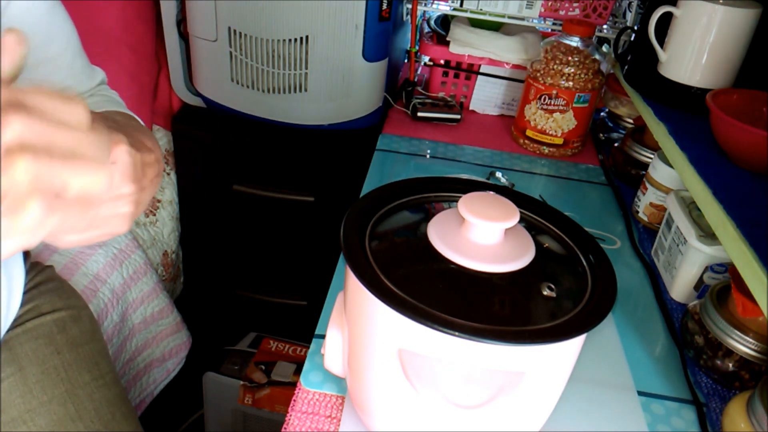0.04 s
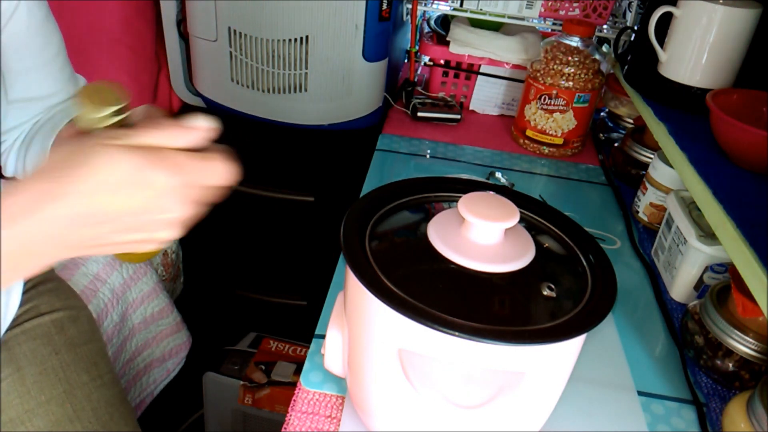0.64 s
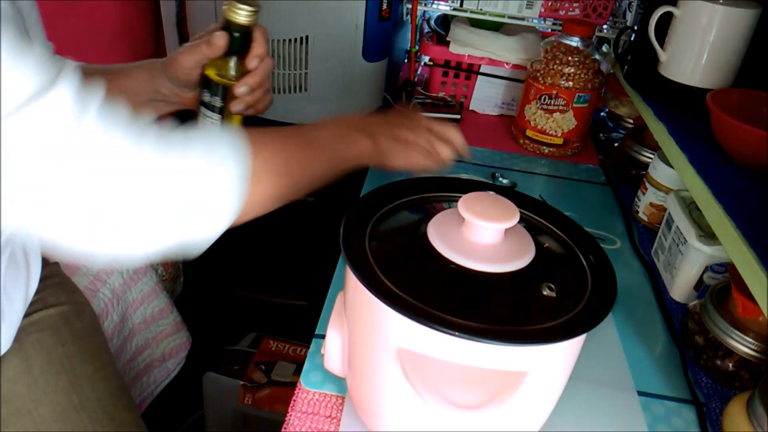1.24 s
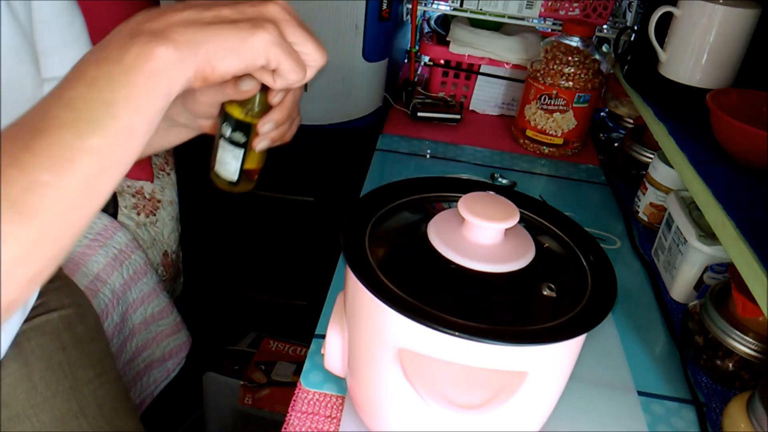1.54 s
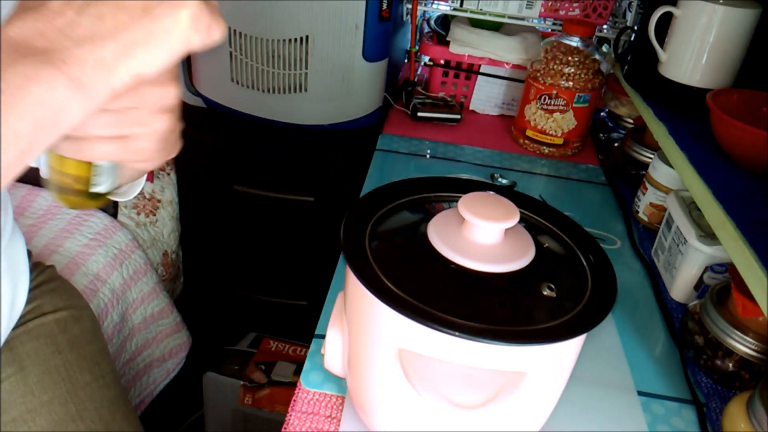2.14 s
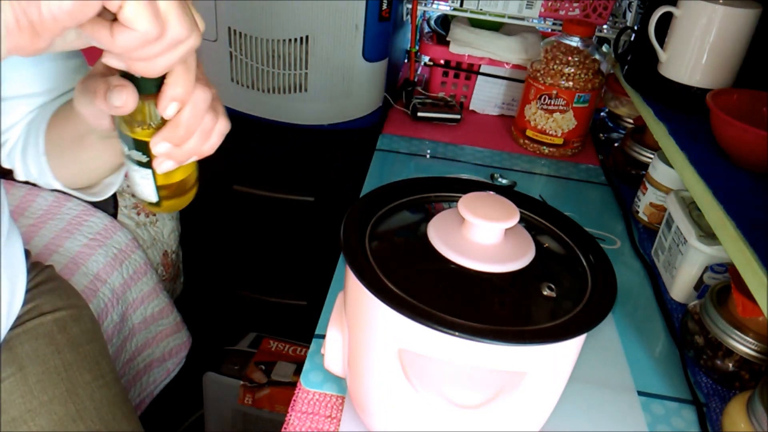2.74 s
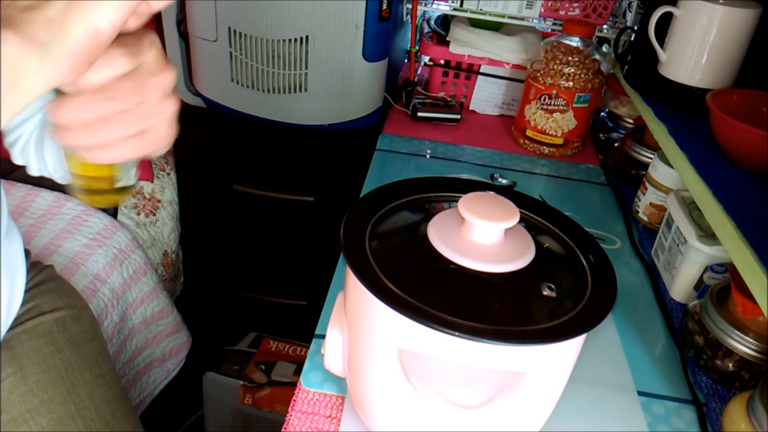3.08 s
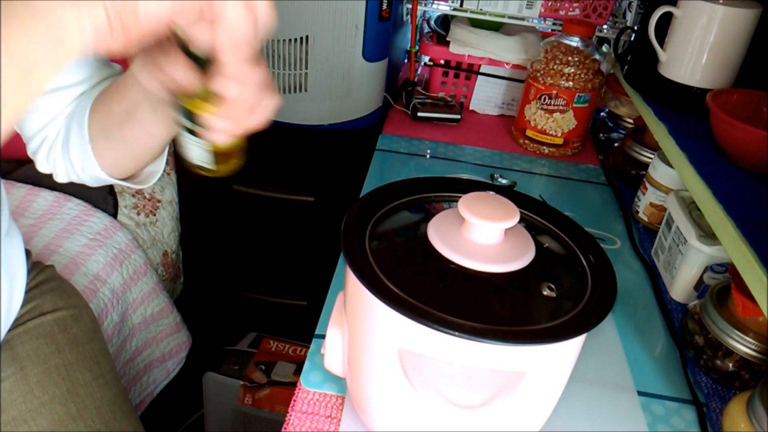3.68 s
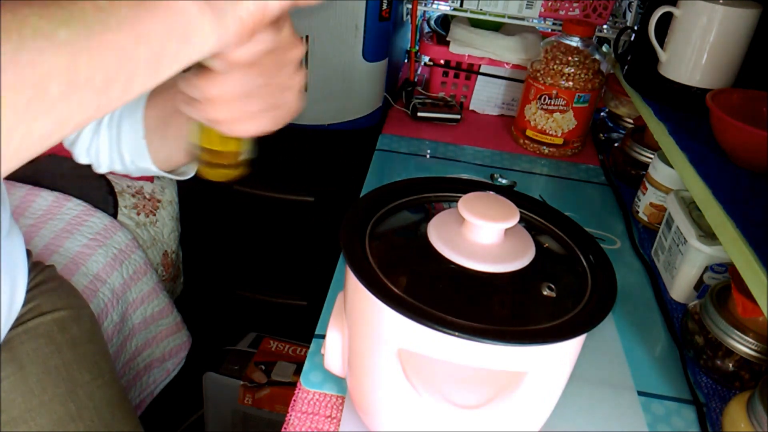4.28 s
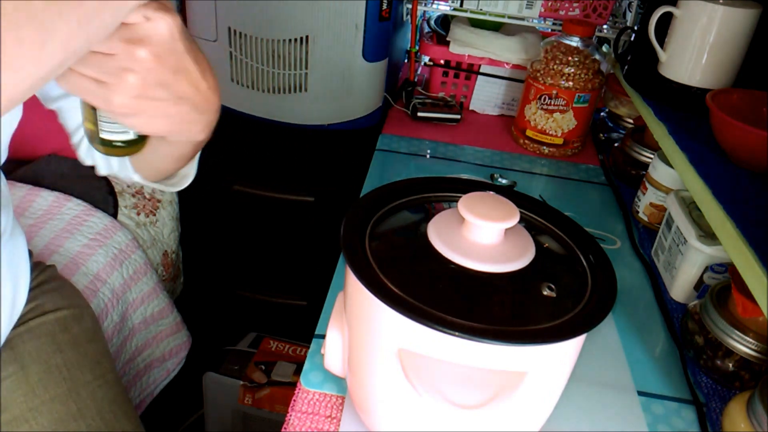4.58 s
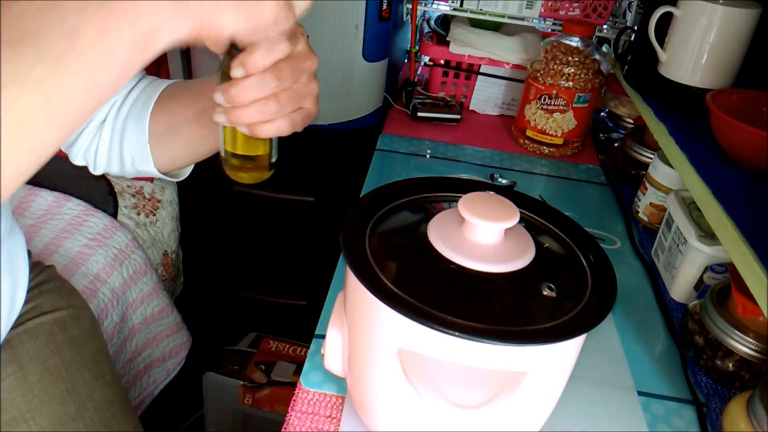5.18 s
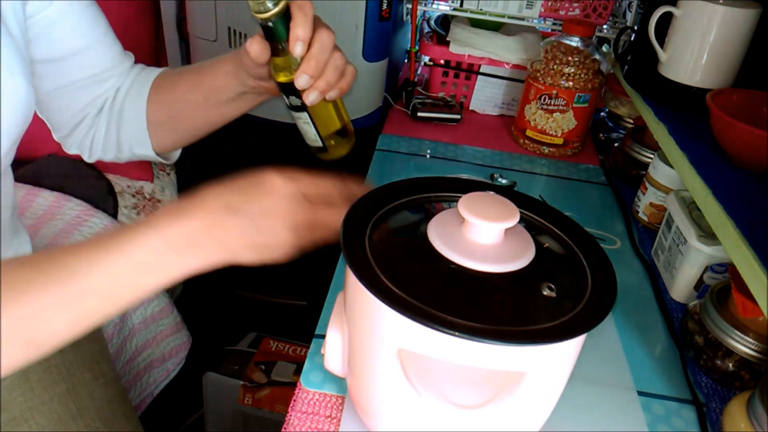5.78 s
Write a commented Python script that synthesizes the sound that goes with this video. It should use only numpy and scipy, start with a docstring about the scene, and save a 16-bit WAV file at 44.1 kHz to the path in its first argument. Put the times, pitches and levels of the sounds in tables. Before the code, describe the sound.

A faint, steady low hum and hiss fill a small kitchen, heard in stereo from close by. Between about 0.2 and 0.7 seconds, fingers make a few light, high ticks and a small scrape on the screw cap of a small glass bottle. Around 0.7 to 0.9 seconds the bottle knocks softly and dully in the hand, and sleeves brush faintly afterwards. At about 2.1 to 2.2 seconds the cap is twisted and its seal tears in two quick clusters of loud, sharp snaps. Another snap comes at 2.5 seconds, a softer one at 3.1, and a loud pair at 4.3 and 4.4. Each snap is bright, rings very briefly and has a short echo. Soft, low hand bumps follow from 4.5 to 4.8 seconds, then a barely audible sleeve brush near 5.3, leaving the hum until about 6 seconds.

```python
"""Fingers tick and scrape on the screw cap of a small glass bottle, which knocks dully in the hand.
Then each twist snaps bridges of the seal, some in quick pairs: a bridge tears and the cap rings briefly.
Fingertips whisper over the glass, hands bump softly and sleeves brush. The small kitchen answers with
a short echo, and a low hum and hiss lie under it all. Two microphones hear it from close by."""
import sys
import numpy as np
from scipy import signal
from scipy.fft import rfft, irfft, next_fast_len
from scipy.io import wavfile
from scipy.ndimage import uniform_filter1d, map_coordinates

SR = 44100
rng = np.random.default_rng(int(sys.argv[2]) if len(sys.argv) > 2 else 0)


def wav_out(sig):
    """Save sig, one row per channel (or a flat mono array), as 16-bit PCM at SR to the path in sys.argv[1]."""
    wavfile.write(sys.argv[1], SR, np.round(np.clip(np.atleast_2d(sig).T, -1, 1) * 32767).astype(np.int16))


N = 256648


# Ticks and snaps of the cap. Each row: start in seconds, level in dB, low cut in Hz, lower favoured mode
# in Hz, its lift in dB, upper favoured mode in Hz, its lift in dB, amount of body, amount of treble,
# pan to the left in dB, room send in dB.
CAP_SNAPS = [(0.251, -30, 7040, 6500, 5.5, 9700, 10, -5.5, 4.5, 0, 4),
             (0.4644, -40, 6840, 6500, -6, 8300, 5, -11, 7, -3, 6.5),
             (0.7156, -27, 5500, 5200, -2, 8000, 8, -5, 10.5, -3, -10),
             (0.7213, -27.5, 4900, 5060, 4, 9550, 9, -2.5, 5, 3, 6),
             (2.1261, -12, 1820, 5080, 5, 6550, 8.5, 1, -1, -1, -7),
             (2.1302, -19, 1820, 5080, 4.5, 6900, 7, 1.5, -2, 1.5, -8),
             (2.1345, -13, 1556, 4820, 4.5, 6520, 5, 5, 2, 2.5, -5),
             (2.1777, -11, 1440, 4910, 1, 6770, 5, 4, -5.5, -1, -10),
             (2.1840, -23, 1700, 3200, 0.5, 6920, 7, -1.5, -6.5, -4.5, -7.5),
             (2.1888, -13, 1550, 2846, 8, 8100, 2, 2, -2.5, -2, -6.5),
             (2.4819, -13.5, 2170, 2460, 3, 8440, 9.5, -5, .5, -2, -0.5),
             (3.1435, -21, 1560, 3400, 15, 9340, 6.5, -5, 0.5, -1, 0.5),
             (4.3012, -12, 3120, 6060, 4.5, 8600, 3, -6.5, -3, 3, -4),
             (4.3964, -15.5, 1760, 3120, 10, 7890, 4, -5, -3, -0.5, -4)]

def snaps(rise_s=.0003, tear_s=.0027, tear_gain=.446, ring_t60=.04, alike=.22, lag_s=.00018, spread=.45):
    """A bridge tears in a few milliseconds and leaves the hand-damped cap ringing."""
    track, t = np.zeros((2, N)), np.arange(SR // 2) / SR
    force = (fade(t, ring_t60) + tear_gain * (t < tear_s)) * (1 - np.exp(-t / rise_s))
    for s, db, edge_hz, low_hz, low_db, high_hz, high_db, body, treble, pan_db, wet_db in CAP_SNAPS:
        shared, own = rng.standard_normal(len(t)), rng.standard_normal((2, len(t)))
        # the sound reaches the right microphone a little earlier
        shared = np.array([np.roll(shared, round(lag_s * SR)), shared])
        burst = evened((np.sqrt(alike) * shared + np.sqrt(1 - alike) * own) * force)

        def click(lift):
            favoured = [(low_hz, 520, lift * low_db), (high_hz, 520, lift * high_db)]  # 520 Hz wide
            ring = ringing(burst, lambda hz: cap_colour(hz, edge_hz, favoured, body, treble)[None])
            return ring / np.sqrt(np.mean(ring[:, :SR // 200] ** 2))  # rms 1 over the first 5 ms

        # the favoured modes beam at the microphones; the walls get only a share of their lift
        add(track, s, amp(db) * (direct(click(1), pan_db) + room(click(spread), wet_db)))
    return track


# Resonances of the cap's skirt. Each row: centre in Hz, width in Hz, lift in dB.
SKIRT_MODES = [(1573, 110, 7.5), (2730, 420, 6), (3425, 170, 3), (4050, 240, 4.5), (5060, 68, 3),
               (5300, 170, 3.5), (5810, 250, 3.5), (6225, 210, 1.5), (6690, 350, 0), (7250, 540, 1.5),
               (8877, 300, 1), (12870, 670, 4)]
# The bright crack of a bridge. Each row: frequency in Hz, relative level in dB.
CRACK_TONE = [(100, -18.5), (900, -16), (1600, -17.5), (2200, -15.5), (4000, -10.5), (6000, -5.5),
              (8300, 0), (10500, -8.5), (13900, -13), (14600, -24), (16000, -35)]

def cap_colour(hz, edge_hz, favoured, body, treble, stop_db=-13.5):
    """Gain in dB: small ticks move only the stiff high modes; big snaps flex the whole skirt."""
    passed = 1 / (1 + (edge_hz / (hz + 100)) ** 14)
    low_cut = 10 * np.log10(amp(stop_db) ** 2 + passed)
    body_db = along([(4500, .76), (6500, .076)], hz) * body
    modes = humps(SKIRT_MODES + favoured, hz)  # each place on the rim favours two modes
    return along(CRACK_TONE, hz) + modes + low_cut + body_db + shelf(hz, treble)


# The bottle shifts in the hand. Each row: start in seconds, level in dB, pitch in Hz.
BOTTLE_KNOCKS = [(0.667, -41, 213), (0.711, -35.5, 287), (0.76, -36, 265), (0.775, -48, 273),
                 (.921, -44, 660)]

def knocks(rise_s=.0032, t60=.047):
    """The grip damps each dull knock of the bottle within a few cycles."""
    track, t = np.zeros((2, N)), np.arange(SR // 8) / SR
    shape = (1 - np.exp(-(t / rise_s) ** 2)) * fade(t, t60)
    for s, db, hz in BOTTLE_KNOCKS:
        add(track, s, (amp(db) * shape * np.sin(2 * np.pi * hz * t))[None])
    return track


# Slides on the cap. Each row: peak time in seconds, level in dB, half-length in seconds, amount of treble.
RIM_SLIDES = [(0.378, -42.5, 0.0051, -4), (0.398, -54.5, 0.017, 11), (1.928, -57, .004, -27),
              (2.082, -62, 0.0048, -8)]
# The thin rasp of skin. Each row: frequency in Hz, relative level in dB.
SKIN_TONE = [(3000, -31), (5500, -12.5), (6600, 2.5), (8500, -3), (10500, -8.5), (13800, -12),
             (15000, -38.5)]

def scrapes():
    """Fingers rasp over the knurled rim."""
    rasp = sum(amp(db) * swell(s, length) * slips(lambda hz: along(SKIN_TONE, hz) + shelf(hz, treble))
               for s, db, length, treble in RIM_SLIDES)
    return direct(rasp) + room(rasp, wet_db=12.5)


# Light touches on the bottle. Each row: peak time in seconds, level in dB.
TOUCHES = [(.028, -68.5), (1.21, -75), (2.711, -72.5), (3.68, -73), (4.81, -80)]
# Their airy whisper. Each row: frequency in Hz, relative level in dB.
TOUCH_TONE = [(3000, -20), (6000, -7), (9000, -7), (13500, -11), (15000, -30.5)]

def rustles(half_length_s=.038):
    """Dry fingertips whisper over glass and label."""
    pressure = sum(amp(db) * swell(s, half_length_s) for s, db in TOUCHES)
    return slips(lambda hz: along(TOUCH_TONE, hz)) * pressure


def slips(colour_db, grain=.598):
    """Skin catches in a dense run of tiny slips, at rms 1."""
    sizes = np.exp(grain * np.repeat(rng.standard_normal(N), 16)[:N])
    return unit(filtered(rng.standard_normal((2, N)) * sizes, lambda hz: amp(colour_db(hz))))


# Soft bumps of hands and sleeves. Each row: peak time in seconds, level in dB, pitch in Hz.
HAND_BUMPS = [(.412, -55, 124), (.565, -62.5, 269), (.752, -55, 92), (2.575, -60, 189), (3.344, -55, 172.7),
              (4.555, -53.5, 99.7), (4.596, -51.5, 95.4), (4.665, -51.5, 94.4), (4.775, -60, 185.3)]

def bumps(half_length_s=.015, jolt_db=-49.5, jolt_hz=96, jolt_delay_s=.008):
    """Hands bump as they change grip and jolt with every snap, alike in both channels."""
    grips = sum(thud(hz, amp(db) * swell(s, half_length_s)) for s, db, hz in HAND_BUMPS)
    jolts = sum(amp(db + jolt_db) * swell(s + jolt_delay_s, half_length_s) for s, db, *_ in CAP_SNAPS)
    return grips + thud(jolt_hz, jolts, width=.49)


def thud(centre_hz, shape, width=.21):
    """Dull noise around one pitch, at the level of the given shape."""
    noise = filtered(rng.standard_normal(N), lambda hz: np.exp(-(np.log((hz + 1) / centre_hz) / width) ** 2))
    return unit(noise * shape) * np.sqrt(np.mean(shape ** 2))


# Sleeves brush as the arms move. Each row: peak time in seconds, level in dB, lift of the rasp in dB.
SLEEVE_BRUSHES = [(0.452, -56, -4), (0.62, -60, -2), (0.935, -60, -7), (1.236, -64, 11), (1.492, -55, -7),
                  (2.08, -57, 0.5), (3.02, -56.5, -9), (4.63, -60.5, -15), (5.32, -63, -10)]
# The soft swish of cloth. Each row: frequency in Hz, relative level in dB.
CLOTH_TONE = [(150, -26.5), (500, -8), (1000, 1.5), (1700, -8.5), (3000, -10), (7000, -29), (14000, -42),
              (15000, -50.5)]

def sleeves(half_length_s=.033, flutter_db=3, folds_per_s=70, rasp_hz=3220, rasp_width_hz=2000):
    """Cloth rubs on cloth, unevenly as the folds pass; each brush has its own amount of rasp."""
    folds = map_coordinates(rng.standard_normal(N // 100), [np.arange(N) * folds_per_s / SR])
    rub = unit(rush(lambda hz: along(CLOTH_TONE, hz)) * amp(flutter_db * folds))
    return sum(filtered(rub * swell(s, half_length_s),
                        lambda hz: amp(db + humps([(rasp_hz, rasp_width_hz, rasp_db)], hz)))
               for s, db, rasp_db in SLEEVE_BRUSHES)


# How the microphone ports colour the stereo image. Each row: frequency in Hz, left over right in dB.
PORT_BALANCE = [(1500, 1), (2700, -0.5), (3500, -2), (5000, -4), (7100, -8.5), (7900, 2), (8600, 9.5),
                (10200, 4.5), (11500, 2), (14000, -1)]

def direct(x, pan_db=0):
    """Direct sound meets the ports from one side."""
    return filtered(x, lambda hz: amp(sides(along(PORT_BALANCE, hz) + pan_db)))


# Length of the kitchen's tail. Each row: frequency in Hz, rough decay time in seconds.
TAIL_TIMES = [(300, 0.36), (2500, 0.11), (6500, 0.27), (10000, 0.2), (14000, 0.23)]
# What the walls give back. Each row: frequency in Hz, gain in dB.
WALL_TONE = [(1500, 13.5), (4000, 5.5), (6500, 3), (8500, -1.5), (11000, 1), (14000, -2), (14900, -25.5)]

def room(x, wet_db=0, near_db=-18, near_t60=.095, far_db=-21, tail_bend=1.8, sidedness=.45):
    """The counter's near scatter and the walls' short tail come from all round."""
    bands, t, spectra = signal.stft(rng.standard_normal((2, SR // 2)), SR, nperseg=256)
    age = (t / along(TAIL_TIMES, bands)[:, None]) ** tail_bend  # the tail holds, then dies ever faster
    far = signal.istft(spectra * fade(age, .93), SR, nperseg=256)[1]
    t = np.arange(far.shape[1]) / SR
    near = rng.standard_normal(far.shape) * fade(t, near_t60) * (t > .004)
    echo = (amp(near_db) * unit(near) + amp(far_db) * unit(far)) / np.sqrt(len(t))
    # sound from all round keeps only a share of the ports' left-right colour
    port_db = lambda hz: sidedness * sides(along(PORT_BALANCE, hz))
    echo = filtered(echo, lambda hz: amp(wet_db + along(WALL_TONE, hz) + port_db(hz)))
    return signal.fftconvolve(x, echo, axes=1)[:, :x.shape[1]]


# The bed of room tone. Each row: frequency in Hz, relative level in dB.
ROOM_TONE = [(15, -48.5), (25, -19.5), (86, 0), (118, -3), (191, -3.5), (301, -7), (335, -12.5),
             (515, -5.5), (604, -6.5), (1210, -10.5), (1670, -18), (2370, -18.5), (3500, -24),
             (5500, -22.5), (8550, -25.5), (13800, -50.5), (15000, -58)]
# The colour of its drone. Each row: centre in Hz, width in Hz, lift in dB.
DRONE_BANDS = [(84, 26, 3.5), (560, 160, -0.5), (1163, 130, 3), (370, 14, -0.5)]

def background(level_db=-57.5):
    """The drone of the room wavers in patches under a thin, even hiss."""
    bed = rush(lambda hz: along(ROOM_TONE, hz) + humps(DRONE_BANDS, hz))
    bands, _, spectra = signal.stft(bed, SR, nperseg=2048)
    patches = uniform_filter1d(rng.standard_normal(spectra.shape[1:]), size=5, axis=0)  # across pitch
    patches = unit(uniform_filter1d(patches, size=4, axis=1))  # across time
    depth_db = along([(1500, 2.275), (5000, .45)], bands)[:, None]
    return amp(level_db) * signal.istft(spectra * amp(depth_db * patches), SR, nperseg=2048)[1][:, :N]


# Stereo width of cloth and room tone. Each row: frequency in Hz, left-right likeness from -1 to 1.
LIKENESS = [(30, 0.68), (70, .93), (150, .94), (300, .8), (640, 0.77), (1300, .15), (2600, -0.47),
            (6000, 0.086)]

def rush(colour_db):
    """Stereo noise with its mid at rms 1: nearly mono in the bass, wide in the treble."""
    width = lambda hz: np.tan(np.arccos(along(LIKENESS, hz)) / 2)
    response = lambda hz: amp(colour_db(hz)) * np.array([np.ones_like(hz), width(hz)])
    mid, side = filtered(rng.standard_normal((2, N)), response)
    return np.array([mid + side, mid - side]) / np.std(mid)


def evened(burst, size=4096, smooth_bins=55):
    """Give a noise burst the same energy in every broad band, so that only the cap colours it."""
    power = uniform_filter1d(np.mean(np.abs(rfft(burst, size)) ** 2, axis=0), size=smooth_bins)
    return ringing(burst, lambda hz: -10 * np.log10(np.abs(power[None]) + 1e-12), size=size)


def ringing(x, gain_db, size=4096):
    """x through a causal filter with the given gain: it rings only after the blow."""
    cepstrum = irfft(np.log(amp(gain_db(np.fft.rfftfreq(size, 1 / SR)))))
    cepstrum[..., 1:size // 2] *= 2
    cepstrum[..., size // 2 + 1:] = 0
    return signal.fftconvolve(x, irfft(np.exp(rfft(cepstrum))), axes=-1)[..., :x.shape[-1]]


def filtered(x, response):
    """Equalise x with a gain given by frequency."""
    n = x.shape[-1]
    padded = next_fast_len(n + SR // 4)
    return irfft(rfft(x, padded) * response(np.fft.rfftfreq(padded, 1 / SR)), padded)[..., :n]


def along(points, hz):
    """Read a curve of (Hz, value) points on a log axis."""
    freqs, values = np.transpose(points)
    return np.interp(np.log(hz + 1), np.log(freqs + 1), values)


def humps(modes, hz):
    """Gain in dB of a set of resonances."""
    return sum(db / (1 + (2 * (hz - centre) / width) ** 2) for centre, width, db in modes)


def shelf(hz, treble):
    """Gain in dB of a lift or cut of the top octave."""
    return along([(8000, .051), (11500, .93)], hz) * treble


def sides(difference_db):
    """Split a left-right difference over both channels, in dB."""
    return np.array([[.5], [-.5]]) * difference_db


def fade(t, t60):
    """Exponential decay, 60 dB down at t60."""
    return np.exp(-np.log(1000) * t / t60)


def swell(s, half_length):
    """A bell-shaped rise and fall around time s."""
    return np.exp(-.5 * np.minimum(((np.arange(N) / SR - s) / half_length) ** 2, 100))


def amp(db):
    """Decibels to gain."""
    return 10 ** (np.asarray(db) / 20)


def unit(x):
    """Scale to rms 1."""
    return x / np.sqrt(np.mean(x ** 2) + 1e-20)


def add(track, s, sound):
    """Mix a sound in at time s."""
    part = track[:, round(s * SR):][:, :sound.shape[1]]
    part += sound[:, :part.shape[1]]


def scene():
    """Cap, hands and room together."""
    return snaps() + scrapes() + rustles() + bumps() + knocks() + sleeves() + background()


def record(dry, ceiling=.8, top_hz=16400):
    """The highest peaks are rounded off and the treble falls steeply to the band limit."""
    roll_off = [(14000, 0), (14800, -3), (15400, -12), (16300, -24)]  # Hz, dB
    rounded = dry / (1 + (dry / ceiling) ** 8) ** (1 / 8)
    return filtered(rounded, lambda hz: amp(along(roll_off, hz)) * (hz < top_hz))


dry = scene()
out = record(dry)
wav_out(out)
```